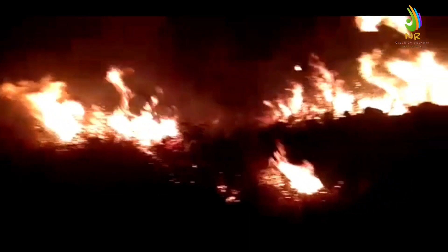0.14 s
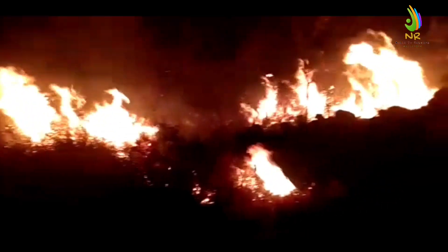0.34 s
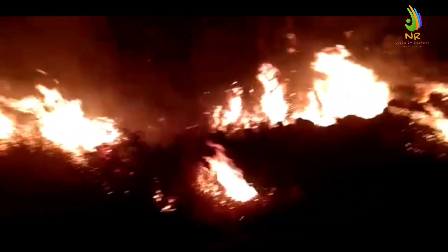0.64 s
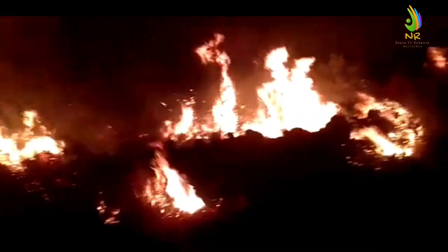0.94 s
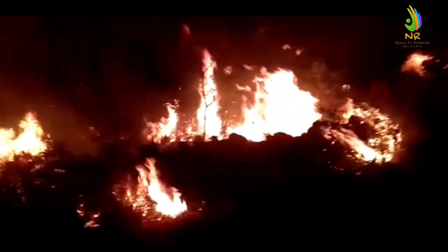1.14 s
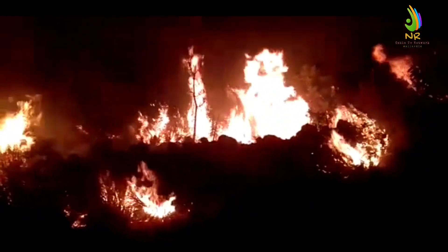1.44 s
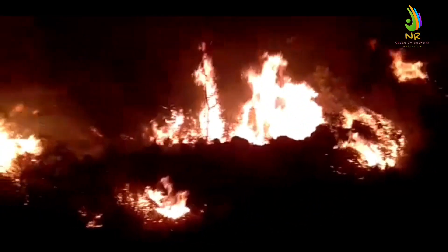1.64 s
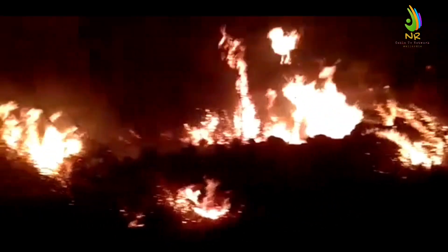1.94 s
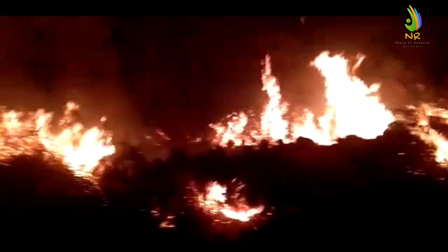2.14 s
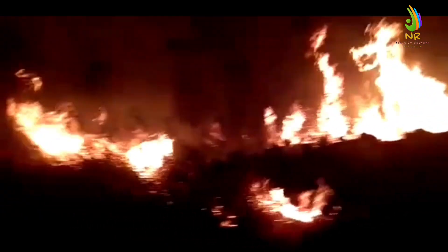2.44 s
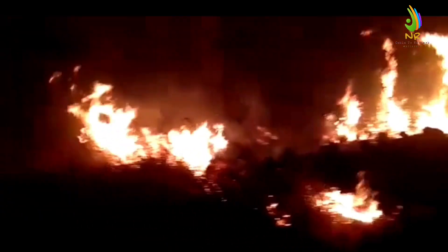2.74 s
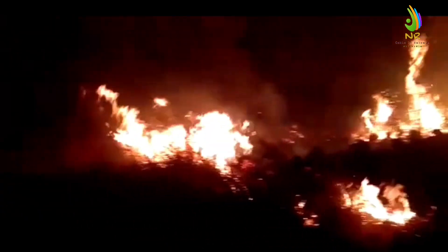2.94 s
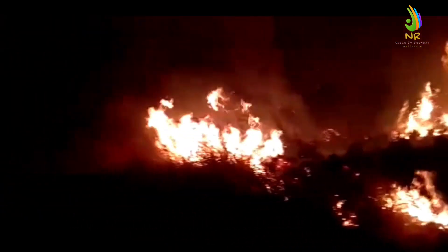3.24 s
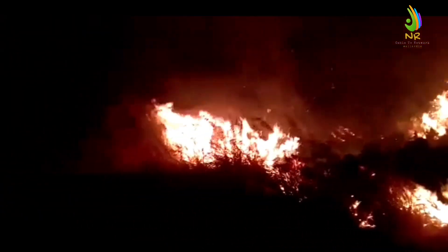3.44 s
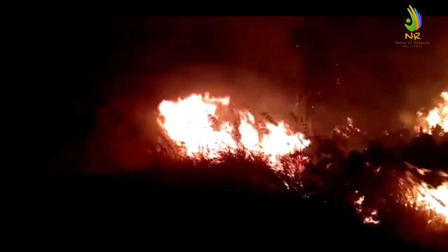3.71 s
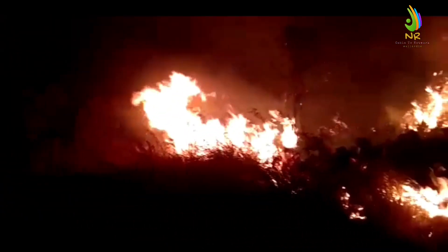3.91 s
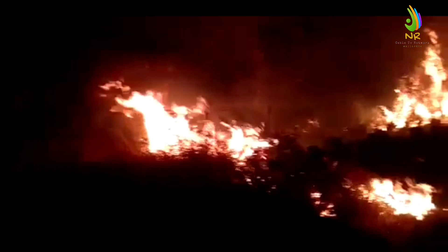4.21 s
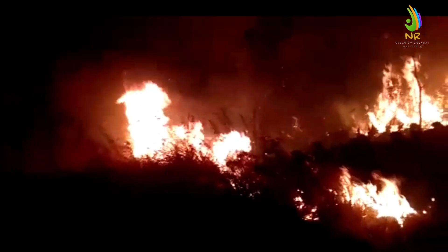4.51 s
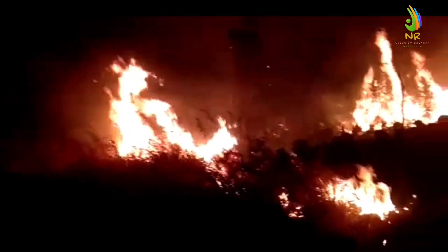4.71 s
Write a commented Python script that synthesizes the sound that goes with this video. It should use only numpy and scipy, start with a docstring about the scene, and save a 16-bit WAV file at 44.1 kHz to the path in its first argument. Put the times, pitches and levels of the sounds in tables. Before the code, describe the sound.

A continuous fine, crackling hiss from burning brush fills the stretch, easing around three seconds and then recovering. Bright, very short twig cracks and tiny leaf ticks stand out close by. Low, rounded wind thuds strike a handheld microphone throughout, heaviest between about 2.6 and 3.9 seconds, some led in by a breathy low swell. Open air, little echo, slightly overloaded at peaks.

```python
"""Brush fire in low scrub

A dense sizzle of tiny bursts over a soft rush of flames, with leaves ticking and twigs snapping close by.
Filtered noise and random impulses make the fire; each snap is a short ringing tone with a crack.
Puffs of air thud on the microphone as slowing eddies, mostly in pairs, often led in by a hollow draught.
The strongest thuds drive the recorder's limiter, which ducks the sizzle."""
import sys
import numpy as np
from scipy import signal
from scipy.fft import rfft, irfft, next_fast_len
from scipy.io import wavfile
from scipy.ndimage import uniform_filter1d, minimum_filter1d, map_coordinates

SR = 44100
rng = np.random.default_rng(int(sys.argv[2]) if len(sys.argv) > 2 else 0)


def wav_record(signal):
    """Record a signal, one row per channel, as 16-bit PCM in the file named by sys.argv[1]."""
    frames = np.transpose(np.atleast_2d(signal))
    bounded = np.clip(frames, -1, 1)
    # unit amplitude maps onto the largest positive 16-bit level
    quanta = np.round(bounded * 32767).astype(np.int16)
    wavfile.write(sys.argv[1], SR, quanta)


N = 214546  # samples


def amp(db):
    """Decibels to gain."""
    return 10 ** (np.asarray(db) / 20)


def unit(x):
    """Scaled to rms 1."""
    return x / np.sqrt(np.mean(x ** 2) + 1e-20)


def clock():
    """The time of every sample, in seconds."""
    return np.arange(N) / SR


def wobble(rate):
    """A smooth random curve, rate knots a second."""
    knots = rng.standard_normal(int(N * rate / SR) + 4)
    return map_coordinates(knots, [clock() * rate])


def gate(start, end, fade):
    """1 between two times, dying away exponentially outside them."""
    t = clock()
    outside = np.minimum(t - start, 0) - np.maximum(t - end, 0)
    return np.exp(outside / fade)


def filtered(x, response):
    """x times a response of frequency."""
    size = next_fast_len(N + SR // 2)
    hz = np.fft.rfftfreq(size, 1 / SR)
    return irfft(rfft(x, size) * response(hz), size)[:N]


def coloured(x, points):
    """x through a causal minimum-phase filter whose gain follows (Hz, dB) points."""
    size = 8192
    hz, db = np.transpose(points)
    gain = amp(np.interp(np.log(np.fft.rfftfreq(size, 1 / SR) + 1), np.log(hz), db))
    # folding the cepstrum onto positive times makes the filter causal
    cepstrum = irfft(np.log(gain))[:size // 2]
    cepstrum[1:] *= 2
    impulse_response = irfft(np.exp(rfft(cepstrum, size)))
    return signal.fftconvolve(x, impulse_response)[:len(x)]


def noise(points):
    """Noise of rms 1 with the given spectrum."""
    return unit(coloured(rng.standard_normal(N), points))


def bursts(rate, spread_db, range_db):
    """Random impulses of rms 1, rate a second: many small, a few large."""
    size_db = np.minimum(spread_db * rng.exponential(size=N), range_db)
    happens = rng.random(N) < rate / SR
    return unit(happens * rng.choice([-1, 1], N) * amp(size_db))


def add(track, s, sound):
    """Mix a sound into the track from time s."""
    start = int(np.clip(round(s * SR), 0, N - 1))
    track[start:start + len(sound)] += sound[:N - start]


# spectrum of the light breeze at the microphone: freq_hz, relative level_db
BREEZE = [(15, -36), (35, -29), (60, -1), (85, -1), (140, -2.5), (220, -10), (400, -18), (1000, -29),
          (3000, -74)]


def breeze(level_db=-41.5, swing_db=5.0):
    """A light breeze never stops: low noise whose strength wanders."""
    return amp(level_db + swing_db * wobble(rate=5.84)) * noise(BREEZE)


# puffs of air on the microphone: start_s, length_s, level_db, relative air speed,
# draught_s (time it leads the puff), draught strength (0-1 of the puff)
PUFFS = [(0.0, 0.019, -14, 0.91, 0, 0), (0.06, 0.047, -11.5, 1.01, 0.065, 0.08),
         (0.502, 0.069, -10, 0.93, .14, 0.39), (0.659, 0.0203, -9, 1.05, 0, 0.13),
         (.992, 0.038, -11, 1.35, 0.041, 0.27), (1.089, 0.047, -12, 0.86, 0, 0),
         (1.429, 0.061, -6.5, 1, .105, 0.22), (1.679, 0.0143, -8, 0.91, 0, 0.01),
         (2.114, 0.046, -9.5, 1.04, .155, 0.27), (2.237, 0.017, -10, .99, 0, 0.05),
         (2.614, 0.031, -8, 1.08, .145, .24), (2.757, 0.016, -5.5, 0.91, 0, 0),
         (3.173, .04, -11.5, 1.05, .21, .33), (3.326, 0.02, -5.5, 0.96, 0, 0.1),
         (3.665, 0.04, -8, 0.89, .065, 0.24), (3.832, 0.021, -4.5, 1.02, 0, 0.01),
         (4.175, .062, -9, 0.87, 0.071, 0.13), (4.526, 0.0114, -9.5, 1.15, 0, 0)]
# resonances of the hollow tone: pitch_hz, width_hz, relative level_db
HOLLOW = [(219, 5.2, 0.5), (434.6, 6.5, -13)]


def hollow_tone(level_db=-39, fade_s=0.02, longest_pair_s=0.3):
    """Noise through narrow resonances, from the start of a draught to the second puff of a pair."""
    blowing = np.zeros(N)
    for (s, _, _, _, draught_s, strength), (next_s, *_) in zip(PUFFS, PUFFS[1:]):
        if strength > 0 and next_s - s < longest_pair_s:
            blowing += amp(level_db) * gate(s - draught_s, next_s, fade_s)

    def resonances(f):
        """Sum of band-pass resonators."""
        return sum(amp(db) * (1j * f * width / (hz * hz - f * f + 1j * f * width))
                   for hz, width, db in HOLLOW)

    return blowing * unit(filtered(rng.standard_normal(N), resonances))


# spectrum of the air moving ahead of a puff: freq_hz, relative level_db
RUMBLE = [(15, -17), (35, -33), (60, -10), (90, -3.5), (140, -3), (220, -8.5), (400, -15.5), (1000, -30.5),
          (3000, -84)]


def draughts(swell_db_per_s=53, surge_db=4.5, surge_s=0.067, fade_s=0.009, flutter_db=2):
    """Air gathers in separate eddies, swells, then surges just ahead of its puff."""
    flow = np.zeros(N)
    for s, _, db, _, draught_s, strength in PUFFS[:-1]:  # the last puff has no draught
        ahead = np.maximum(s - clock(), 0)
        swell_db = -swell_db_per_s * ahead - surge_db * np.minimum(ahead / surge_s, 1)
        flow += strength * amp(db + swell_db) * gate(s - draught_s, s, fade_s)
    eddies = unit(coloured(bursts(rate=220, spread_db=6.5, range_db=8.5), RUMBLE))
    flutter = amp(flutter_db * wobble(rate=40))
    return flow * unit((eddies + 0.5 * noise(RUMBLE)) * flutter)


# spectrum of the eddies in a puff, before its speed shifts it: freq_hz, relative level_db
EDDIES = [(12, -20.5), (30, -20), (55, -1), (85, 2), (125, -1), (200, -10.5), (300, -20.5), (500, -27),
          (800, -39.5), (1400, -47.5), (4000, -91)]


def puffs(rise_share=0.07, fall_s=0.0072, lead_s=0.03, slowing_octaves_per_s=16, evenness=0.52, vent_hz=43):
    """Each puff throws a few eddies on the diaphragm; they slow down as the air comes to rest."""
    out, t = np.zeros(N), np.arange(SR // 5) / SR - lead_s
    vent = signal.butter(2, vent_hz, "high", fs=SR, output="sos")  # slow pressure leaks past the diaphragm
    for s, length, db, speed, _, _ in PUFFS:
        # short puffs arrive abruptly, long ones build up
        flow = np.exp(np.minimum(t, 0) / (rise_share * length) - np.maximum(t - length, 0) / fall_s)
        slowing = 2 ** (slowing_octaves_per_s * (length / 2 - np.maximum(t, 0)))
        eddies = signal.hilbert(coloured(rng.standard_normal(SR // 2), EDDIES))
        # the eddies of one puff are about equally strong
        eddies = eddies.real / uniform_filter1d(np.abs(eddies), size=700) ** evenness
        position = SR // 10 + np.cumsum(speed * slowing)
        passing = map_coordinates(eddies, [position], order=1)
        push = signal.sosfilt(vent, flow * passing)
        body = push[(t > 0) & (t < length)]
        push *= amp(db) / np.sqrt(np.mean(body ** 2))
        before_start = max(0, round((lead_s - s) * SR))
        add(out, s - lead_s, push[before_start:])
    return out


# spectrum of the leaf ticks: freq_hz, relative level_db
TICKS = [(800, -26), (3000, 0), (6500, 1), (10500, 4.5), (12500, -15), (15000, -2)]


def ticks(level_db=-50, clump_db=3):
    """Dry leaves close by give off flurries of tiny bright ticks."""
    flurries = amp(clump_db * wobble(rate=7.86)) * bursts(rate=57, spread_db=2.0, range_db=10)
    return amp(level_db) * unit(coloured(flurries, TICKS))


def random_twigs(count=20, level_db=-14.5, spread_db=1.2, thick_hz=3960, thin_hz=6560):
    """Snaps at random moments, thick twigs lower than thin ones: start_s, relative level_db, pitch_hz."""
    return [(rng.uniform(0, N / SR), rng.normal(level_db, spread_db),
             rng.choice([thick_hz, thin_hz]) * rng.lognormal(0, 0.039)) for _ in range(count)]


# twigs snapping at set moments, most of them loud: start_s, relative level_db, pitch_hz
SNAPS = [(0.0064, -7, 3950), (0.2689, -10, 6600), (0.391, -12, 6560), (0.5734, -9.5, 6240),
         (0.5821, -10, 3400), (0.7138, -12.5, 6440), (1.7882, -9.5, 3640), (1.8758, -7, 6900),
         (2.0087, -11, 4160), (2.2912, -11, 6300), (2.4309, -15.5, 6750), (2.5371, -5, 6600),
         (2.7049, -8.5, 3870), (2.7334, -7, 6570), (2.934, -9.5, 6330), (2.9821, -15.5, 6570),
         (3.0926, -11.5, 6860), (4.4179, -7.5, 6330), (4.4268, -7, 6740), (4.7382, -9, 6440)]
# colour of a snap: freq_hz, gain_db
SNAP_COLOUR = [(400, -8), (1400, -12.5), (2600, 1.5), (6500, 2.0), (8500, 0.5), (11000, -2.5), (15000, -8)]


def snaps(ring_t60_s=0.0032, crack_t60_s=0.0026, crack=0.5, scatter_db=-22, scatter_t60_s=0.1):
    """A twig splits with a sharp crack and rings a few cycles; the scrub around scatters the sound."""
    out, t = np.zeros(N), np.arange(SR // 20) / SR
    for s, db, hz in list(SNAPS) + random_twigs():
        ring = np.sin(2 * np.pi * hz * t) * amp(-60 * t / ring_t60_s)
        split = crack * rng.choice([-1, 1], len(t)) * amp(-60 * t / crack_t60_s)
        snap = coloured(ring + split, SNAP_COLOUR)
        scatter = unit(coloured(rng.standard_normal(len(t)), SIZZLE))
        scatter *= amp(scatter_db - 60 * t / scatter_t60_s)
        add(out, s, amp(db - 1.0) * (snap + scatter))
    return out


# spectrum of the whole sizzle: freq_hz, relative level_db
SIZZLE = [(1180, -39.5), (2000, -13), (2560, -8), (3840, 1), (4480, 0), (5360, -3.5), (6640, 1.5),
          (7110, -1), (8510, -13.5), (10200, -16), (12100, -25), (14700, -23), (15500, -31)]


def sizzle(stalks, hiss_db, crackle_db, clump_db):
    """Countless plant cells burst: far ones blur to a hiss, near ones crackle in clumps."""
    hiss = amp(hiss_db) * rng.standard_normal(N)
    clumps = amp(crackle_db + clump_db * wobble(rate=30))
    crackle = clumps * bursts(rate=1800, spread_db=5, range_db=19.0)
    return unit(coloured(coloured(hiss + crackle, SIZZLE), stalks))


# spectrum of the flame rush: freq_hz, relative level_db
FLAMES = [(200, -3.5), (500, -2), (900, -0.5), (1500, 1.5), (2200, -1.5), (4000, -12.5), (9000, -33)]


def flame_rush():
    """Flames rush as steady noise mixed with many small bursts."""
    puffing = unit(coloured(bursts(rate=600, spread_db=11.0, range_db=22.0), FLAMES))
    return unit(noise(FLAMES) + 0.81 * puffing)


# how hard the scrub burns, in relative levels: start_s, thick_stalks_db, thin_stalks_db, flame_rush_db
BLAZE = [(0.0, -36.5, -34.5, -45), (0.34, -32.5, -32, -45), (0.68, -33.5, -35, -47.5),
         (0.87, -33, -33.5, -42), (1.14, -33.5, -34.5, -43.5), (1.66, -34.5, -36.5, -46),
         (2.06, -34, -34, -45), (2.25, -35, -35, -47), (2.9, -38, -37, -51.5), (3.22, -38, -37, -48.5),
         (3.52, -35.5, -33, -49.5), (3.84, -37, -35.5, -50), (4.43, -35, -32, -47), (4.86, -35.5, -34, -49)]
# share of the sizzle that thick stalks give: freq_hz, gain_db
THICK = [(1500, -2), (4700, -0.5), (6100, -11), (12000, -19)]
# share of the sizzle that thin stalks give: freq_hz, gain_db
THIN = [(1500, -11), (4300, -11), (5700, -1), (12000, 0)]


def fire():
    """Thick stalks sizzle lower than thin ones; both flare with the rush of the flames."""
    s, *levels = np.transpose(BLAZE)
    flare_db = 0.34 * wobble(rate=6.8) + 1.2 * wobble(rate=55)
    thick_db, thin_db, flame_db = (np.interp(clock(), s, db) + flare_db for db in levels)
    thick = amp(thick_db + 1.0) * sizzle(THICK, hiss_db=0.0, crackle_db=-4.5, clump_db=1.5)
    thin = amp(thin_db + 1.0) * sizzle(THIN, hiss_db=-0.5, crackle_db=-3, clump_db=2.5)
    return thick + thin + amp(flame_db + 2.5) * flame_rush()


def scene():
    """The air at the microphone, the leaves and twigs close by, and the fire."""
    air = breeze() + hollow_tone() + draughts() + puffs()
    return (air + ticks() + snaps() + fire())[None]


def record(dry, ceiling=0.82, clip_level=0.73, top_hz=15750):
    """A fast limiter ducks everything under the loudest peaks, tips are rounded, the top is cut off."""
    needed = np.minimum(1, ceiling / (np.abs(dry[0]) + 1e-9))
    # the gain is held low around each peak, then smoothed (sizes in samples)
    gain = uniform_filter1d(minimum_filter1d(needed, size=600), size=400)
    held = dry[0] * gain
    # the 2.0 also lowers quiet sound slightly, by about 0.6 dB
    rounded = held / (2.0 + np.abs(held / clip_level) ** 10) ** (1 / 10)
    return filtered(rounded, lambda hz: hz < top_hz)[None]


dry = scene()
out = record(dry)
wav_record(out)
```